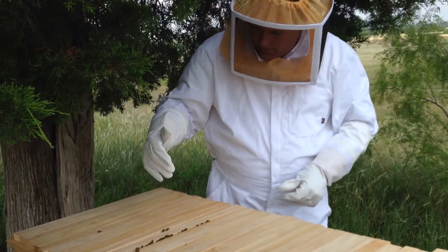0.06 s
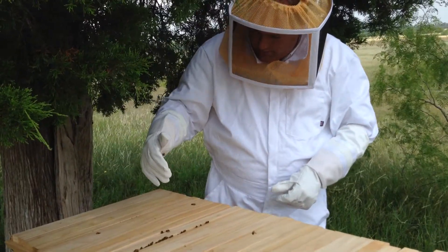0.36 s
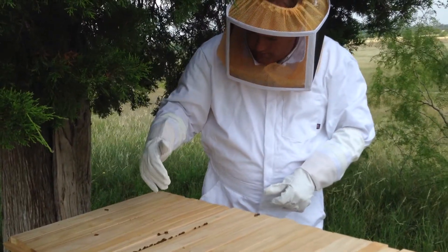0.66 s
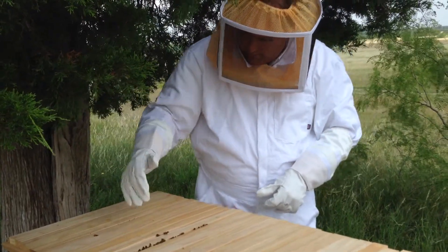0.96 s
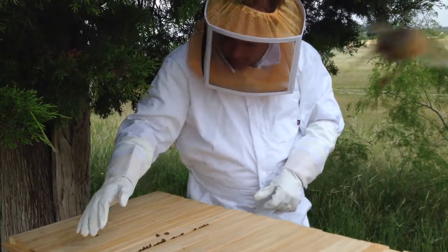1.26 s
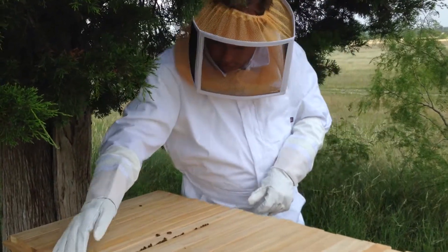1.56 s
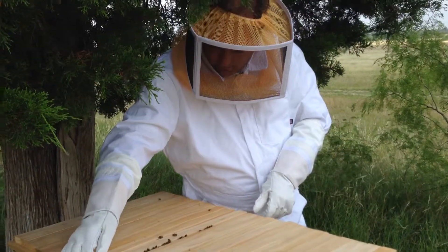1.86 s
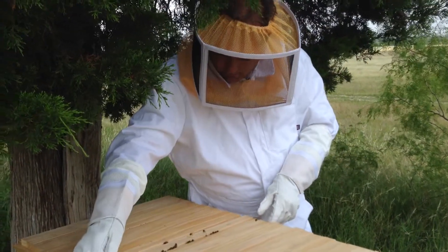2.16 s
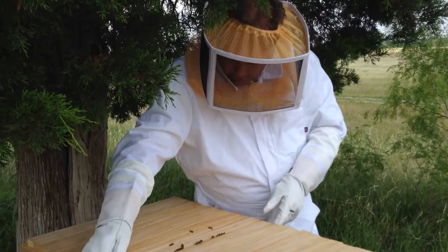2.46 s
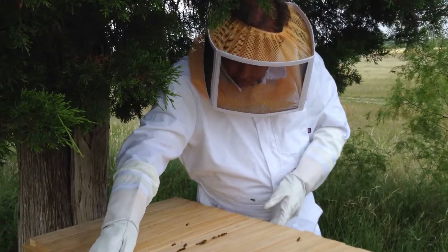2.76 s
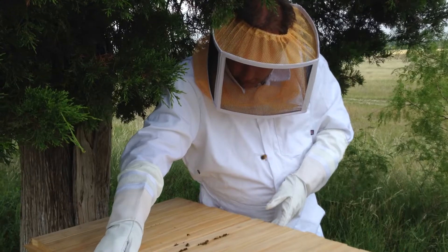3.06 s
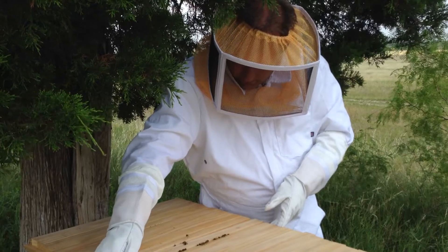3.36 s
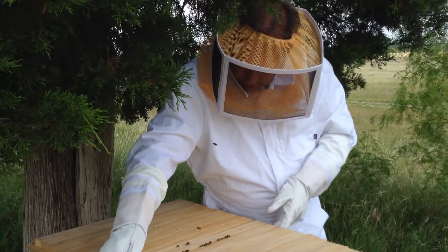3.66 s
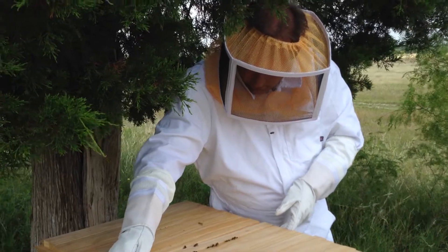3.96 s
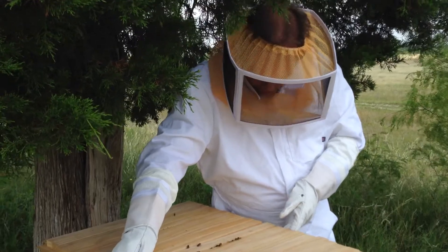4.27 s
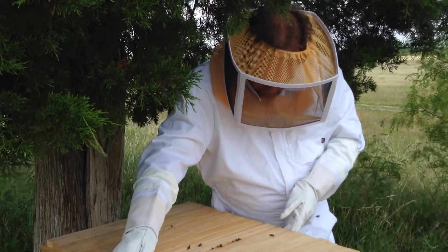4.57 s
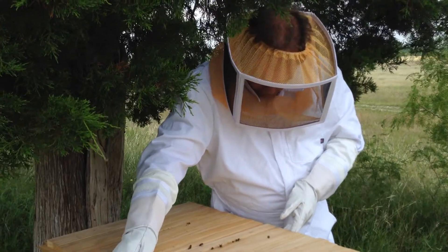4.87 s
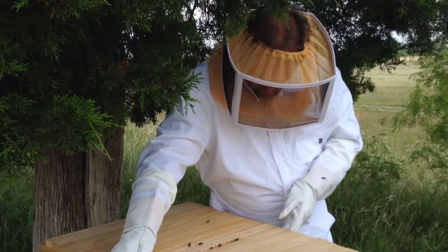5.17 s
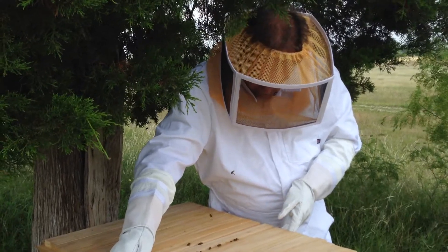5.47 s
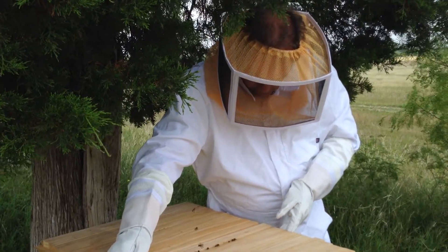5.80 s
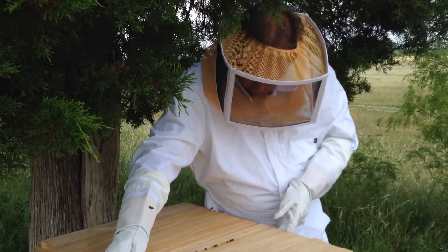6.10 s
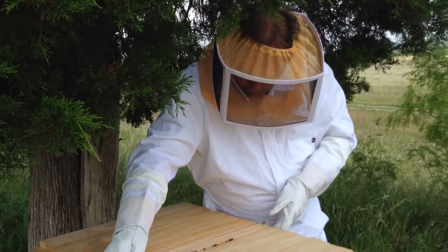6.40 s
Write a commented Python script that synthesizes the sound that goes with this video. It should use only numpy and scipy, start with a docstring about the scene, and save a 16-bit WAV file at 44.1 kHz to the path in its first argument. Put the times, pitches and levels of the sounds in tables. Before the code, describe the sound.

Beside a wooden hive in a field, a faint colony hum sits under a steady soft hiss. Two distant bees pass, then one darts right by the microphone with a raspy, wavering buzz. A low wind rumble sets in as a few more bees pass faintly. In the second half the breeze grows into the loudest sound, buffeting the microphone with irregular thumps.

```python
"""A field, beside an opened wooden hive. One honeybee darts right past the microphone and others pass
further off, over the soft hum of the colony. Each is a stack of wingbeat harmonics; the closest adds a
rasp of air once a stroke. A breeze rises and buffets the microphone: a low rumble with single eddies
thumping through it. Underneath lies a steady hiss, with two faint ticks near the start."""
import sys
import numpy as np
from scipy import signal
from scipy.fft import rfft, irfft
from scipy.io import wavfile
from scipy.ndimage import uniform_filter1d, map_coordinates

SR = 44100
rng = np.random.default_rng(int(sys.argv[2]) if len(sys.argv) > 2 else 0)


def to_wav(sig):
    """Store sig (one row per channel, or 1-D mono) as 16-bit WAV at the path in sys.argv[1].

    Samples outside -1..1 are clipped; the rate is SR.
    """
    pcm = np.clip(np.atleast_2d(sig), -1, 1) * 32767
    pcm = np.round(pcm).astype(np.int16)
    wavfile.write(sys.argv[1], SR, pcm.T)  # frames by channels


N = 292824
TIME = np.arange(N) / SR

# The close bee's pitch line. Each row: time in seconds, wingbeat in Hz.
CLOSE_PITCH = [(1.05, 279.8), (1.216, 281.1), (1.234, 300.5), (1.276, 263), (1.304, 296.8), (1.446, 286.2),
               (1.462, 270), (1.63, 299.5), (1.688, 285), (1.708, 261.2), (1.778, 284), (1.85, 278.6)]
# Its level as it weaves to and fro. Each row: time in seconds, hum in dB, overtones in dB.
CLOSE_WEAVE = [(1.0, -92, -81), (1.12, -68.5, -65.5), (1.275, -64, -63), (1.315, -48, -51),
               (1.368, -65, -65.5), (1.4, -49, -56), (1.43, -59, -65), (1.475, -50, -56.5),
               (1.523, -59, -66.5), (1.553, -45.5, -52), (1.603, -55, -62), (1.638, -58, -62.5),
               (1.725, -67, -65), (1.775, -71, -59.5), (1.83, -76, -69), (1.9, -92, -84)]
# Bees further off. Each row: closest moment in seconds, level in dB, approach and retreat widths in
# seconds, wingbeat in Hz, pitch sag in Hz per second.
FLYBYS = [(.3, -65.5, .045, 0.093, 297.4, 25), (0.722, -71.5, 0.071, 0.19, 276.7, 10),
          (2.682, -69.5, 0.079, 0.041, 234, 50), (2.98, -66, 0.064, 0.15, 296.4, 45),
          (3.23, -66.5, 0.059, 0.14, 280, 5), (3.65, -74.5, 0.22, .22, 263.6, 12)]
# Wingbeat harmonics of the close bee, far bees and hive. Each row: frequency in Hz, relative level in dB.
CLOSE_TONE = [(850, 1.5), (1150, -1.5), (1450, 8), (1750, -1), (2300, -10), (3500, -19), (5000, -21),
              (9000, -12)]
FAR_TONE = [(270, -4.5), (570, -1.5), (850, -10.5), (1180, -6), (1450, -5), (1800, -17), (2600, -16.5),
            (3400, -15), (5000, -8)]
HIVE_TONE = [(250, -2.5), (520, -1.5), (780, -4.5), (1150, -6), (1450, -6.5), (1900, -9)]
# Noise colours. Each row: frequency in Hz, relative spectral density in dB.
RASP_EQ = [(300, -3), (900, 2.5), (1600, -1.5), (2500, -6), (4000, -1.5), (7000, -3.5), (11000, -5.5),
           (15000, -12.5)]  # air torn by the wings
SNAP_EQ = [(900, -26.5), (1800, 2), (2400, -1), (3300, 0.5), (4800, -5), (6500, -15), (10000, -21),
           (15000, -24)]  # a wing turning over
RUMBLE_EQ = [(20, -21), (40, -5), (70, 2), (130, -4), (200, -9.5), (280, -19.5), (400, -34.5), (700, -78)]  # large whirls of wind
TURBULENCE_EQ = [(120, -3.5), (230, 0), (330, -2), (480, -3), (650, -13), (850, -24.5), (1200, -39.5),
                 (1800, -54.5), (3000, -80)]  # small whirls
HISS_EQ = [(25, 4.5), (70, 1.5), (150, -4.5), (260, -2.5), (380, -4), (520, 1), (750, -11.5), (1100, -10),
           (1600, -8.5), (2200, -8.5), (2750, -12), (3600, -10), (6000, -13), (15000, -16)]  # field ambience and microphone hiss
# The wind's rise and fall at the microphone. Each row: time in seconds, rumble level in dB.
BREEZE_LEVEL = [(0, -81), (.85, -95), (1.0, -72), (1.68, -67), (1.77, -47), (1.98, -46), (2.1, -53),
                (2.9, -58), (3.03, -47), (3.45, -46.5), (3.68, -53), (3.95, -48), (4.06, -35), (4.36, -27),
                (4.44, -30.5), (4.49, -47), (4.68, -42.5), (5.18, -42), (5.6, -37), (6.08, -33),
                (6.16, -46.5), (6.42, -45), (6.64, -33.5)]
# Eddies striking the microphone. Each row: time in seconds, level in dB, centre frequency in Hz,
# fade width of the swirl in seconds.
EDDY_HITS = [(0.956, -51, 69.4, 0.011), (1.13, -54.5, 70, .01), (1.807, -39, 125, 0.016),
             (1.925, -32.5, 98, 0.0077), (2.31, -38, 87, .008), (3.04, -36.5, 110, 0.019),
             (3.102, -30.5, 131, 0.012), (3.222, -36, 156, .012), (3.299, -38, 110, 0.0043),
             (3.343, -31.5, 68.5, 0.017), (3.471, -34.5, 129.6, 0.03), (3.989, -34, 220, .007),
             (4.02, -30.5, 308, 0.011), (4.06, -21.5, 266, 0.0037), (4.097, -23, 442, 0.0091),
             (4.122, -17, 364, .01), (4.157, -28.5, 336, 0.0036), (4.222, -17, 337, 0.013),
             (4.245, -17.5, 265, 0.011), (4.307, -16, 490, .006), (4.318, -17, 295, 0.013),
             (4.334, -18, 109, 0.017), (4.348, -15, 456, 0.01), (4.364, -20, 187, 0.019),
             (4.391, -18.5, 416, 0.0032), (4.414, -13, 417, 0.0077), (4.446, -24, 266, 0.0038),
             (4.838, -26, 279, .007), (4.893, -39, 287, 0.011), (4.975, -28.5, 189, 0.0049),
             (5.175, -33, 260, 0.0095), (5.242, -22.5, 221, 0.014), (5.268, -23.5, 300, 0.015),
             (5.311, -29, 268, .006), (5.355, -31, 193, .005), (5.396, -31, 176, 0.011),
             (5.437, -24, 300, 0.0045), (5.517, -20.5, 272, 0.012), (5.541, -19.5, 392, 0.0044),
             (5.569, -26, 289, 0.013), (5.661, -15.5, 321, 0.011), (5.762, -26, 301, 0.012),
             (5.819, -21.5, 293, 0.0086), (5.872, -23.5, 323, 0.0035), (5.939, -30, 307, .003),
             (5.975, -27, 283, 0.012), (6.001, -23, 323, 0.031), (6.049, -16.5, 450, .011),
             (6.076, -16.5, 297, .012), (6.475, -34.5, 266, 0.015), (6.514, -34, 257, .008),
             (6.585, -24.5, 346, 0.0043), (6.624, -23.5, 243, 0.012)]
# Soft swells in the hiss. Each row: centre in seconds, boost in dB, half-width in seconds.
HISS_SWELLS = [(.15, 1.4, 0.1), (1.05, .9, 0.31), (2.75, 1.2, 0.43), (6.022, 1.5, 0.18)]
# Faint dry ticks. Each row: time in seconds, relative level in dB.
TICK_HITS = [(.299, -48), (.313, -50)]


def close_bee(buzz_db=-1, rasp_db=-1.46, push_db=-51.5, waver_db=2.4,
              turn_s=1.64, turn_width_s=.063, turn_db=8, overhead_s=1.456, hold_s=.21, fade_s=.034):
    """Up and down strokes hum at twice the wingbeat; right under the wings, their push of air lands."""
    hz, = curves(CLOSE_PITCH)
    hum_db, overtone_db = curves(CLOSE_WEAVE)
    phase = wingbeat(hz, jitter=.01)
    overhead = .5 + .5 * np.tanh((hold_s / 2 - np.abs(TIME - overhead_s)) / fade_s)
    stroke = np.sin(phase) + undb(-12) * np.sin(3 * phase)
    push = undb(push_db + waver_db * walk(45)) * overhead * stroke
    hum = undb(hum_db + waver_db * walk(59.9)) * np.sin(2 * phase)
    overtones = harmonics(phase, np.mean(hz), CLOSE_TONE, scatter=.51, orders=np.arange(3, 27))
    buzz = undb(overtone_db + buzz_db) * overtones
    carried_db = uniform_filter1d(overtone_db, int(.039 * SR))  # torn air follows each swerve more slowly
    bite_db = turn_db * swell(TIME - turn_s, turn_width_s, turn_width_s)  # harder rasp as it turns away
    rasp = undb(carried_db + rasp_db + bite_db) * reflected(wing_rasp(phase))
    return during(CLOSE_WEAVE) * (np.sqrt(2) * (hum + push) + buzz + rasp)


def wingbeat(hz, jitter):
    """Phase of the wing stroke; no two strokes last quite as long."""
    return 2 * np.pi * np.cumsum(hz * (1 + jitter * walk(90))) / SR


def harmonics(phase, hz, spectrum, scatter, orders):
    """Wingbeat harmonics, each joined by its reflections, which add and cancel as the bee moves."""
    stack = 0
    for k, gain in zip(orders, response(hz * orders, spectrum)):
        angle = k * phase + rng.uniform(0, 2 * np.pi)
        stack += gain * ((1 + scatter * walk(25)) * np.sin(angle) + scatter * walk(25) * np.cos(angle))
    return unit(stack)


def wing_rasp(phase, slop_rad=.15, uneven_db=3, focus=.9, snap_gain=.64):
    """The wings flick over once a cycle, a little early or late: an uneven snap and a puff of torn air."""
    cycle = np.floor((phase + slop_rad * walk(150)) / (2 * np.pi))
    turnovers = np.diff(cycle, prepend=0)
    snaps = coloured(turnovers * undb(uneven_db * walk(200)), SNAP_EQ)
    puffs = unit(noise(RASP_EQ) * np.exp(focus * np.cos(phase)))
    return unit(puffs + snap_gain * snaps)


def reflected(x, echo_db=-4, lag_s=.001005, sway=.44):
    """A surface close by adds a copy whose lag moves with the bee, sweeping a comb through the sound."""
    delay_s = lag_s * np.exp(sway * walk(11))
    return unit(x + undb(echo_db) * np.interp(TIME - delay_s, TIME, x))


def wing_draught(level_db=-49, at_s=1.485, width_s=.011):
    """One low puff of downwash as the close bee hangs over the microphone."""
    return undb(level_db) * swell(TIME - at_s, width_s, width_s) * steadied(noise(RUMBLE_EQ), span_s=.11)


def passing_bees(wander=.00319):
    """Single bees a metre or so away: each swells and fades, and its pitch sags as it goes by."""
    mix = 0
    for at_s, db, approach_s, retreat_s, hz, sag in FLYBYS:
        beat_hz = (hz - sag * np.clip(TIME - at_s, -1, 1)) * (1 + wander * walk(12))
        phase = wingbeat(beat_hz, jitter=.004)
        buzz = harmonics(phase, hz, FAR_TONE, scatter=.35, orders=np.arange(1, 14))
        mix += undb(db) * swell(TIME - at_s, approach_s, retreat_s) * buzz
    return mix


def colony(level_db=-69, low_hz=220, high_hz=285, wander=.03, swell_db=2, voices=7):
    """A bed of bees round the hive, each on its own wandering pitch, coming and going."""
    mix = 0
    for hz in np.linspace(low_hz, high_hz, voices):
        phase = wingbeat(hz * (1 + wander * walk(5)), jitter=.01023)
        gain = undb(swell_db * walk(4.44))
        mix += gain * harmonics(phase, hz, HIVE_TONE, scatter=.27, orders=np.arange(1, 8))
    return undb(level_db) * unit(mix)


def wind(flutter_db=3, puff_db=1.07, fine_db=-64, fine_growth=2.07, patchy_db=4, usual_db=-42):
    """Large whirls rumble; small ones come in patches and grow faster as the breeze rises."""
    breeze_db, = curves(BREEZE_LEVEL)
    excess_db = np.maximum(breeze_db, -58) - usual_db
    speed = undb(.14 * excess_db)
    large = swept(noise(RUMBLE_EQ), speed) * undb(flutter_db * walk(40))
    small = swept(noise(TURBULENCE_EQ), np.sqrt(speed)) * undb(patchy_db * walk(110))
    rumble = undb(breeze_db) * steadied(large, span_s=.084)
    fine = undb(fine_db + fine_growth * excess_db) * steadied(small, span_s=.06)
    return undb(puff_db * walk(14)) * (rumble + fine)


def swept(x, speed):
    """A frozen pattern of whirls carried past at a changing speed: faster air sounds higher."""
    return map_coordinates(x, [np.cumsum(speed)], order=3, mode="wrap")


def eddies(wake_db=-9, wake_ratio=.53, wake_lag_s=.0058, swirl_db=-11.5, usual_hz=315):
    """Each eddy thumps the microphone inside a patch of swirls and drags a larger, weaker one behind."""
    mix = np.zeros(N)
    swirls = steadied(noise(TURBULENCE_EQ), span_s=.0156)
    for at_s, db, hz, fade_s in EDDY_HITS:
        lean, wake_lean, lag = rng.uniform(-1, 1, 3)
        near = np.abs(TIME - at_s) < .15
        t = TIME[near] - at_s
        speed = (hz / usual_hz) ** .897  # smaller eddies carry brighter swirls
        swirl = swell(t, .72 * fade_s, fade_s) * np.interp(at_s + t * speed, TIME, swirls)
        wake = vortex(t - wake_lag_s * (1 + lag / 2), hz * wake_ratio, np.pi * wake_lean)
        mix[near] += undb(db) * (vortex(t, hz, lean) + undb(wake_db) * wake + undb(swirl_db) * swirl)
    return mix


def vortex(t, hz, lean, smoothness=4.38):
    """One swing of pressure from a vortex passing at t = 0; the smaller it is, the higher the thump."""
    distance = 2 * np.pi * hz * t / smoothness  # from the microphone, in core radii
    return np.real(np.exp(1j * lean) / (1 - 1j * distance) ** (smoothness + 1))


def hiss(level_db=-64.5):
    """The quiet field and the microphone's own hiss, with a few soft swells."""
    boost_db = sum(db * swell(TIME - at_s, half_s, half_s) for at_s, db, half_s in HISS_SWELLS)
    return undb(level_db + boost_db) * noise(HISS_EQ)


def ticks(trim_db=-9, rise_s=.0005, fall_s=.002):
    """Tiny bright ticks, like a bee bumping into something."""
    envelope = sum(undb(db + trim_db) * swell(TIME - at_s, rise_s, fall_s) for at_s, db in TICK_HITS)
    return envelope * noise(RASP_EQ)


def undb(db):
    """Decibels to gain."""
    return 10 ** (np.asarray(db) / 20)


def unit(x):
    """Scale to rms 1."""
    return x / np.sqrt(np.mean(x ** 2))


def curves(rows):
    """One automation curve per value column of a timed table: straight ramps with rounded corners."""
    times, *columns = np.transpose(rows)
    return [uniform_filter1d(np.interp(TIME, times, column), size=300) for column in columns]


def during(rows, fade_s=.03):
    """A soft gate, open over the time that a table spans."""
    return np.clip(np.minimum(TIME - rows[0][0], rows[-1][0] - TIME) / fade_s, 0, 1)


def swell(t, rise_s, fall_s):
    """A bell-shaped rise to 1 at t = 0, and its fall."""
    return np.exp(-.5 * (t / np.where(t < 0, rise_s, fall_s)) ** 2)


def walk(rate):
    """Smooth random modulation through rate points a second, with spread near 1."""
    knots = rng.standard_normal(4096)
    coarse = TIME[::32]
    return np.interp(TIME, coarse, map_coordinates(knots, [coarse * rate], order=3, mode="wrap"))


def response(hz, spectrum):
    """Gain of an EQ curve at given frequencies."""
    points_hz, db = np.transpose(spectrum)
    return undb(np.interp(np.log(hz + 1), np.log(points_hz), db))


def coloured(x, spectrum):
    """Run a signal through an EQ curve and scale it to rms 1."""
    return unit(irfft(rfft(x) * response(np.fft.rfftfreq(N, 1 / SR), spectrum), N))


def noise(spectrum):
    """Noise of a given colour, rms 1."""
    return coloured(rng.standard_normal(N), spectrum)


def steadied(x, span_s):
    """Level out the slow swells of a noise, leaving its quick ones."""
    return x / np.sqrt(uniform_filter1d(x ** 2, int(span_s * SR)) + 1e-9)


def scene():
    """Bees, wind, hiss and ticks in one mono mix, eased in and out."""
    fades = np.clip(np.minimum(TIME, TIME[-1] - TIME) / .004, 0, 1)
    bees = close_bee() + wing_draught() + passing_bees() + colony()
    return (fades * (bees + wind() + eddies() + hiss() + ticks()))[None]


def record(dry, low_cut_hz=52, high_cut_hz=15300):
    """The microphone sheds the deepest bass; the recorder cuts the top steeply."""
    thinned = signal.sosfilt(signal.butter(2, low_cut_hz, "highpass", fs=SR, output="sos"), dry)
    return signal.sosfilt(signal.ellip(10, .1, 70, high_cut_hz, fs=SR, output="sos"), thinned)


dry = scene()
out = record(dry)
to_wav(out)
```